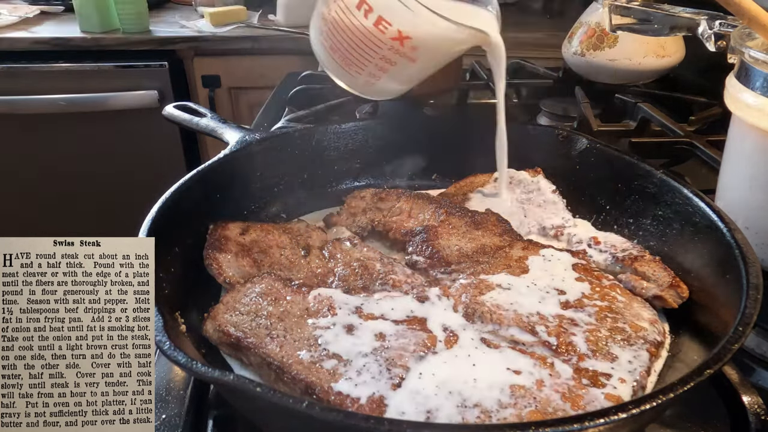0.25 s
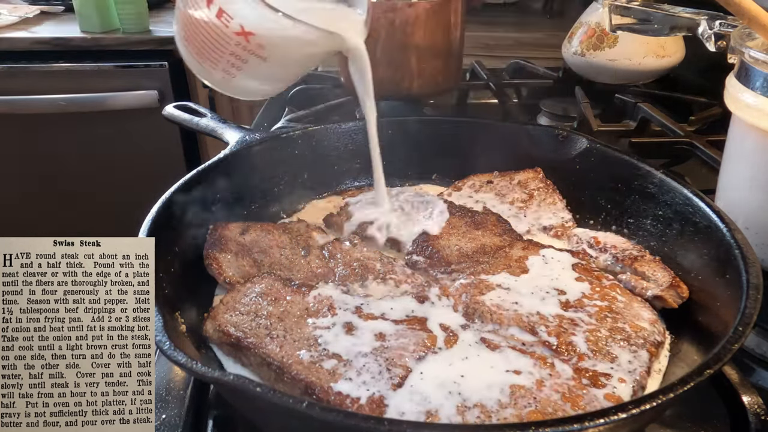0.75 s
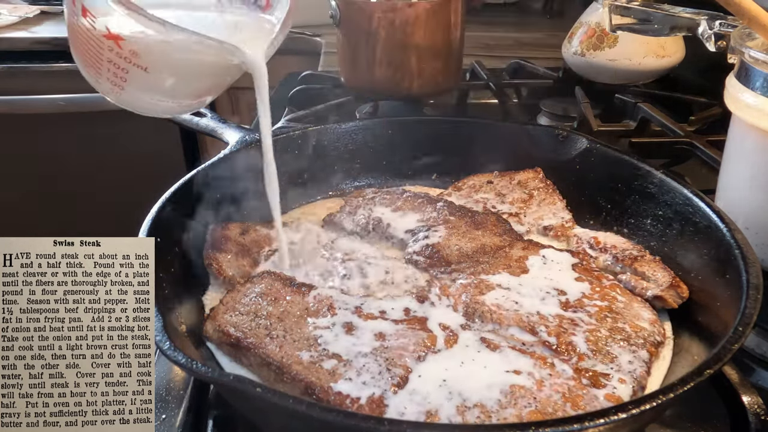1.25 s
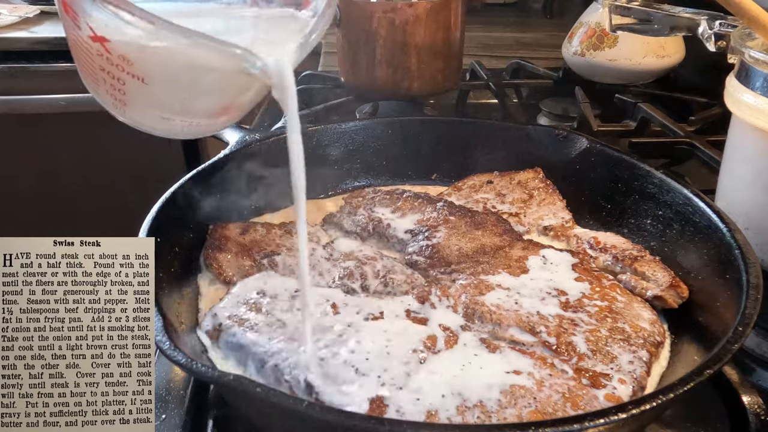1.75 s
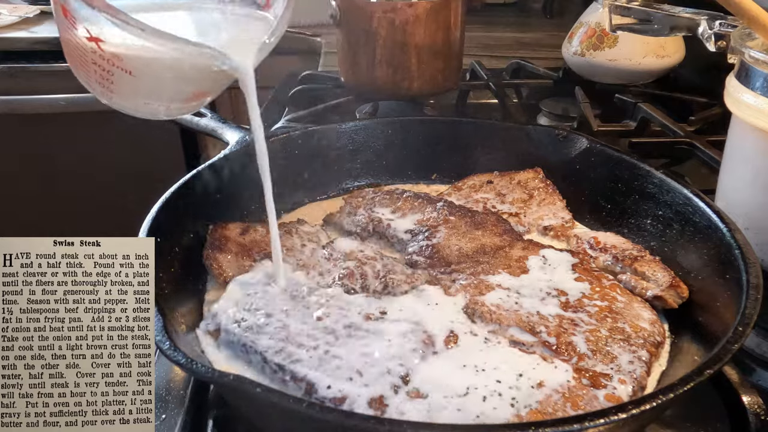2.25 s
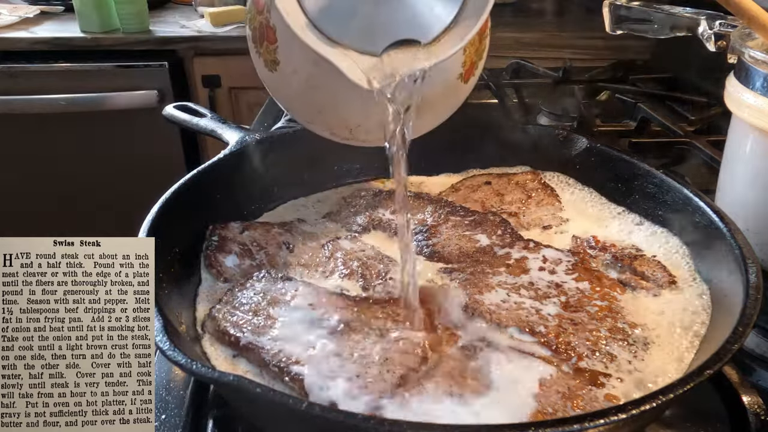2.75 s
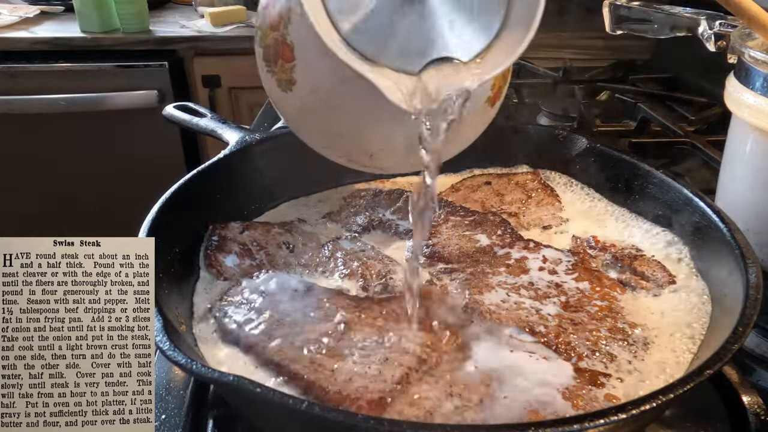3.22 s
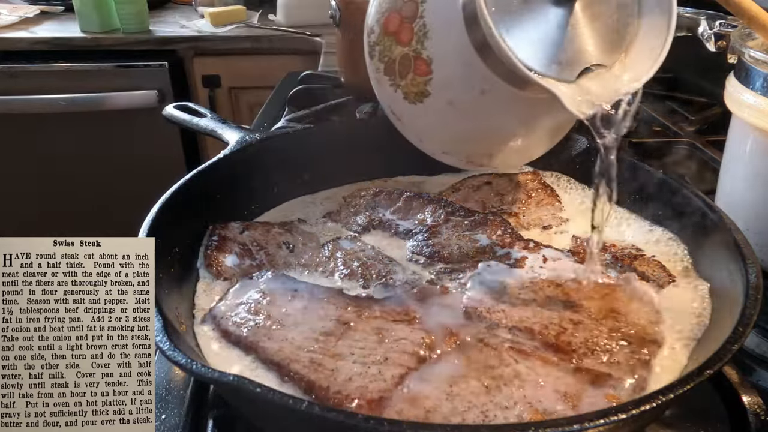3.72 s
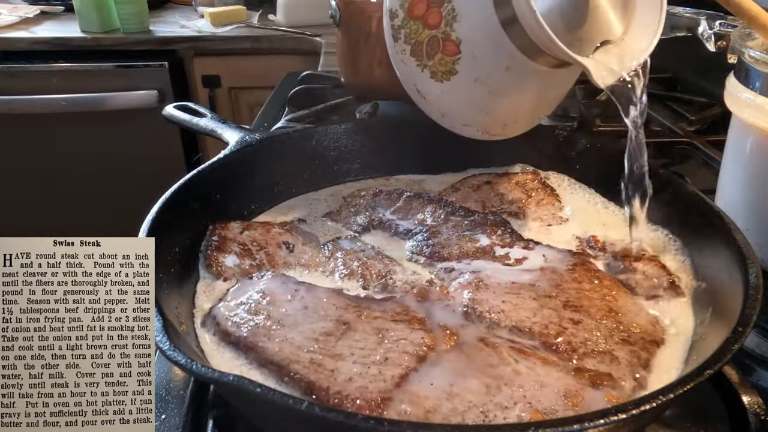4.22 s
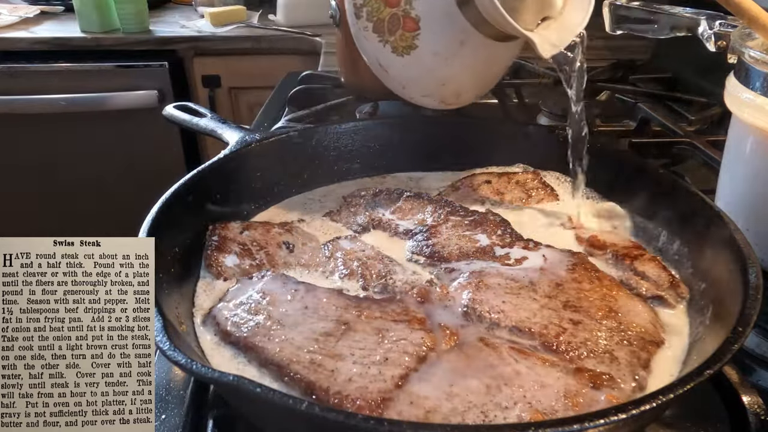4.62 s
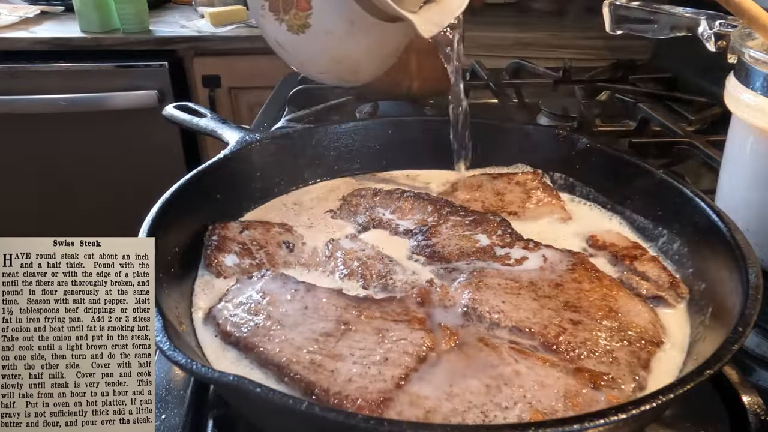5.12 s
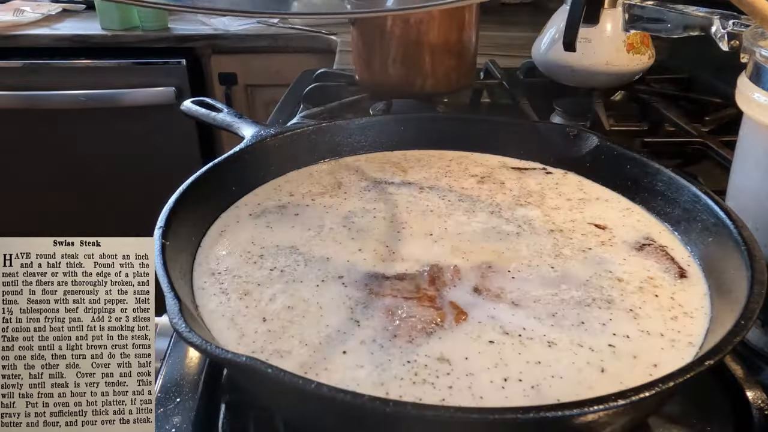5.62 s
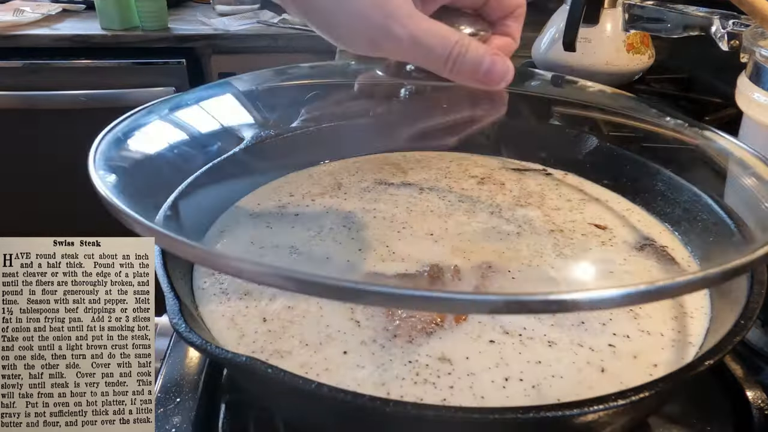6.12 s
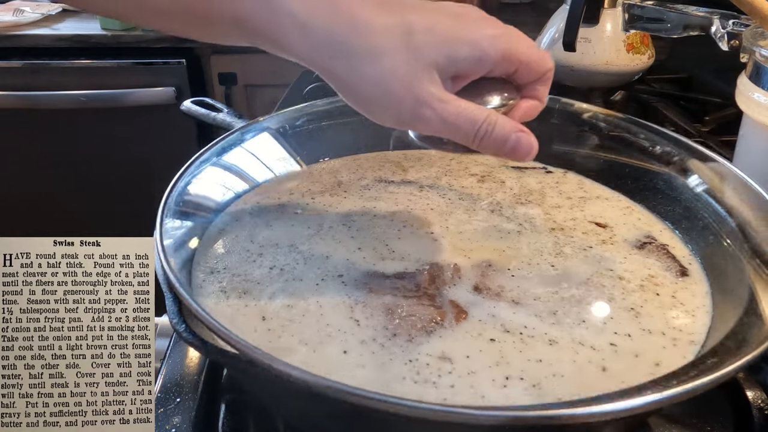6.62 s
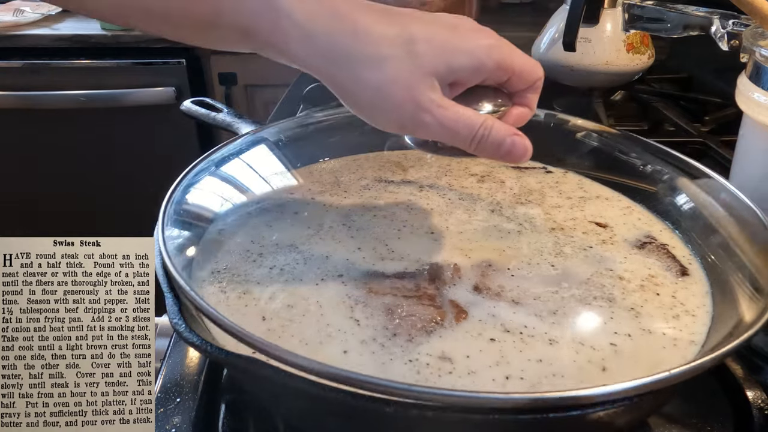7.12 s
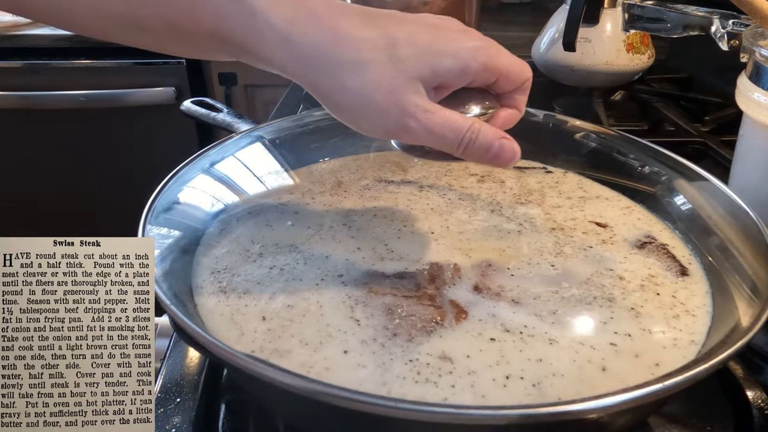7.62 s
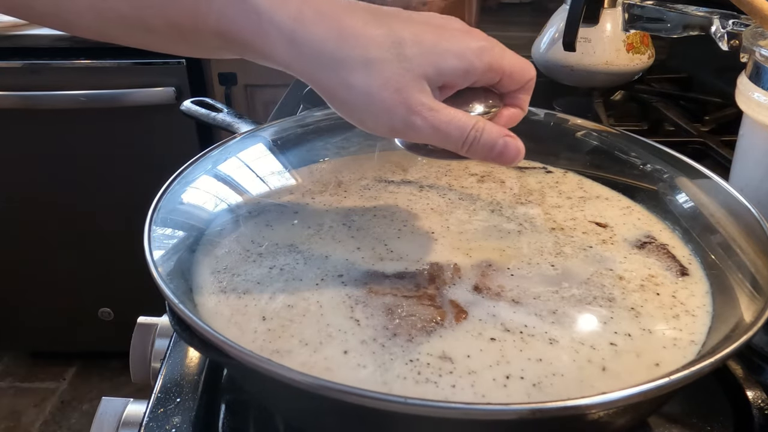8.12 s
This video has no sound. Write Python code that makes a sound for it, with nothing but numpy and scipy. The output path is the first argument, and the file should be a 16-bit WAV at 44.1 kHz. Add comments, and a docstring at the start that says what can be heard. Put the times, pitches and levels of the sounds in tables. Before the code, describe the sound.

A continuous, dense frying sizzle with airy steam hiss, heard close in a small kitchen. Random crackles run throughout, with loud dry snaps thrown out singly and in clusters, the metal pan giving each a very short echo. Low fan noise is barely audible underneath. After about seven seconds the sizzling bed sinks and grows quieter, but strong pops still jump out until the end.

```python
"""A home kitchen: meat fries in a cast-iron skillet while a fan rumbles and hums below.
The fan is low filtered noise with narrow noise bands for hums; hiss of steam and far fat is coloured noise.
Steam pockets bursting in hot fat make a dense sizzle: clumped random clicks through tuned resonances.
Louder pops add a ring of a few cycles, a thump, a crack and a spatter of droplets; the metal echoes them.
Near the end the steady layers and the small pops sink by several dB; the listed loud pops keep their levels."""
import sys
import numpy as np
from scipy import signal
from scipy.fft import rfft, irfft, next_fast_len
from scipy.io import wavfile
from scipy.ndimage import uniform_filter1d

SR = 44100
rng = np.random.default_rng(int(sys.argv[2]) if len(sys.argv) > 2 else 0)


def put_to_file(sound):
    """Save the sound as 16-bit audio at rate SR, in the file named by the first command-line argument."""
    columns = np.atleast_2d(sound).T  # one column per channel
    safe = np.clip(columns, -1, 1)
    whole_steps = np.round(safe * 32767)
    wavfile.write(sys.argv[1], SR, whole_steps.astype(np.int16))


N = 368676   # samples

# Low air rumble of the fan: (frequency [Hz], relative level per Hz [dB])
RUMBLE_SPECTRUM = [(15, -57), (25, -30), (79, 4), (103, 10), (257, -4), (365, -2.5), (400, -5), (520, -39),
                   (880, -120)]
# Fan hums: (frequency [Hz], width of each of two filter passes [Hz], level over the rumble [dB])
FAN_HUMS = [(113.4, 49, -9.5), (702, 39, -1.5), (1484, 220, 0)]
# Steam and far fat: (frequency [Hz], relative level per Hz [dB])
HISS_SPECTRUM = [(88, -33), (150, -6.5), (431, -8.5), (601, -7.5), (702, 0), (1040, -8), (1830, -10),
                 (3420, -2.5), (7770, -6), (11900, -6.5), (16000, -1.5)]
# Tiny bursts in the fat: (frequency [Hz], relative level per Hz [dB])
SIZZLE_SPECTRUM = [(590, -36), (1000, -3), (3500, 3.5), (4120, 3.5), (7620, 1.5), (12000, -3), (16000, 5)]
# Loud pops: (time [s], ring peak before its ceiling [dB], pocket pitch [Hz], length [ms],
#             thump peak [dB], crack peak [dB], spatter level [dB])
LOUD_POPS = [(.0175,-18.5,2750,1.3,-22,-4.5,-46),(.1192,-17,4640,2,-39,-29,-43),(.1816,-12.5,3730,1.2,-40,-31,-46),(.2443,-16,3600,2.2,-42,-26,-41),
             (.263,-10,7500,1.5,-24,-2.5,-39),(.3394,-15,2320,2.5,-44,-28,-26),(.3554,-11,5300,1.4,-16,-13,-30),
             (.3698,-9,3100,2.6,-15.5,-11.5,-31),(.438,-16,8160,.83,-38,-21,-31),(.559,-15,11300,.7,-45,-23,-27),
             (.5632,-8.5,11000,6.1,-41,-29,-46),(.5687,-6,7400,.6,-35,-19,-29),(.6469,-19,1540,2.7,-29,-15,-31),
             (.6647,-10.5,4350,2.3,-46,-30,-25.5),(.678,-15,3860,1.1,-40,-16,-38),(.6913,-12,2800,4.4,-18,-14,-25.5),
             (.7477,-16,3010,1.4,-40,-22,-46),(.7635,-11.5,9800,.91,-41,-22,-41),(.802,-13,4590,1.2,-40,-27,-46),(.833,-12,3100,3.1,-35,-13,-24),
             (.8537,-18,3420,1.7,-43,-18,-35),(.89,-19,1800,1.8,-33,-17,-46),(.9424,-13,8830,0.56,-40,-29,-42),(.9617,0,2550,2.3,-10.5,-6.5,-42),(.9922,-17,8040,.73,-49,-25,-30),(1.0242,-19,11500,.98,-43,-16,-46),(1.0542,-17,10800,1.4,-43,-26,-43),(1.175,-15,5960,0.55,-35,-11.5,-29),
             (1.2387,-22,3250,1.4,-39,-24,-17.5),(1.2477,-13,2800,4.5,-36,-35,-24),(1.3215,-9.5,9800,.56,-39,-24,-46),
             (1.3468,-15,7450,.84,-45,-25,-46),(1.3607,-12,4970,0.88,-44,-21,-32),(1.4038,-16.5,3630,3,-34,-27,-32),(1.4508,-17,6960,0.95,-31,-10.5,-34),
             (1.49,-15,2750,1,-43,-18,-31),(1.5898,-10,10200,1.3,-41,-25,-25),(1.6037,-8.5,9300,2.8,-44,-31,-25),
             (1.6287,-12,3100,3.2,-19.5,-16,-29),(1.6762,-13,6360,.86,-26,-12,-28.5),(1.815,-9,2450,0.63,-27,-5.5,-37),
             (1.925,-23,6400,.6,-39,-11,-30),(2.039,-9,5950,1.3,-22,-8,-46),(2.0965,-18,2800,1.7,-28,-12,-42),
             (2.1378,-17,5400,.84,-33,-20,-29),(2.373,-11,3730,1.5,-34,-31,-49),(2.4954,-17,4970,0.85,-15.5,-5.5,-42),
             (2.5768,-20,12000,2.9,-27,-9,-34),(2.5891,-9,1570,1.3,-12.5,-3,-23.5),(2.5952,-14,5070,7.9,-35,-22,-46),
             (2.6306,-7.5,2450,1.1,-9.5,-13,-30),(2.635,-13.5,4760,3.1,-37,-22,-35),(2.6514,-10,9800,0.38,-37,-16,-46),
             (2.7618,-13.5,5200,0.72,-43,-26,-46),(2.8298,-18.5,2000,1.7,-29,-8,-31),(2.8839,-17,3630,1.4,-40,-22,-47),(2.9405,-19,6450,0.76,-29,-13.5,-27),
             (3.0226,-2,1740,2.9,-5,-5,-23.5),(3.0788,-18,9400,1.4,-42,-15,-50),(3.0847,-14,9400,.65,-42,-11,-42),
             (3.1698,-17,11300,0.79,-40,-7.5,-45),(3.21,-14.5,4630,5.2,-28,-15.5,-23),(3.2713,-4,3030,0.67,-49,-15,-27),
             (3.3114,-14,3870,1.4,-41,-24,-30),(3.319,-10,9200,0.62,-37,-8.5,-29),(3.3684,-17.5,1610,2.7,-34,-19,-34),
             (3.407,-17,3520,4.2,-44,-32,-47),(3.4376,-9,2000,1.9,-28,-22,-29),(3.452,-17.5,1490,3.4,-33,-13,-42),
             (3.4745,-13.5,2000,1.3,-39,-23,-46),(3.5286,-15,3500,3.1,-30,-20,-37),(3.5714,-12.5,2960,3.7,-18.5,-32,-34),
             (3.6111,-11,2130,3.2,-17,-17,-34),(3.6179,-13,5300,3.3,-36,-30,-38),(3.759,-15,2590,0.98,-38,-7.5,-30),
             (3.8926,-16.5,3620,1.8,-37,-27,-44),(3.9522,-4,10300,0.4,-29,-15,-37),(4.0803,-17,3450,1.2,-36,-11,-33),(4.1235,-17,7430,.8,-45,-22,-32),
             (4.1346,-12,10140,.4,-47,-20,-45),(4.141,-4,1900,2,-7.5,-25,-25),(4.1695,-12,7800,1.3,-27,-27,-56),
             (4.1922,-14,8250,.83,-45,-27,-38),(4.226,-9.5,4540,3.4,-32,-26,-32),(4.2348,-6,6760,1.6,-29,-7.5,-18),
             (4.2452,-4,4960,.53,-32,-13,-38),(4.251,-15,5400,7,-38,-17,-21),(4.2644,-20,9190,.79,-42,-16,-47),
             (4.2786,-14,3790,0.9,-30,-10,-30),(4.2911,-11,9040,1.1,-28,-20,-30),(4.3154,-13,1310,2.8,-22,-8,-40),
             (4.3848,-18,11200,1.2,-30,-13,-46),(4.422,-24,8700,3.6,-23,-7.5,-28),(4.502,-18,3200,1.1,-28,-16,-25.5),
             (4.509,-26,3830,4.6,-33,-12,-26),(4.519,-18,5340,1.5,-24,-5,-35),(4.5934,-23,6200,.9,-28,-21,-26.5),
             (4.617,-16,11100,2.3,-39,-30,-32),(4.6327,-17,5000,1.8,-35,-11,-42),(4.6785,-12,2670,1.7,-30,-14,-30),
             (4.6849,-14.5,3140,10,-32,-11,-40),(4.8312,-16,2800,1.2,-31,-26,-27),(4.9328,-36,5330,2.8,-32,-15,-40),
             (4.9897,-13,3550,2.8,-22,-17,-42),(5.168,-19,11500,1.4,-26,-11,-37),(5.3056,-18,3530,3,-37,-18,-29),
             (5.5662,-14,4460,1.8,-37,-17,-22),(5.5735,-22,5200,2.8,-28.5,-10.5,-33),(5.6364,-22,3450,1.6,-47,-26,-30),
             (5.6514,-10.5,4160,0.65,-31,-16,-34),(5.677,-15,3920,1.4,-43,-27,-46),(5.7451,-12,2900,1.1,-25.5,-6,-37),(5.8914,-14.5,3530,4.1,-19.5,-17,-35),
             (5.91,-11.5,4390,0.89,-43,-16,-34),(6.0027,-16.5,2400,1.8,-37,-26,-42),(6.0739,-20,11480,0.64,-33,-12,-46),
             (6.1588,-22,7360,.8,-44,-7,-30),(6.1715,-9,4100,3,-29,-13,-16),(6.1802,-25,5450,2.4,-34,-11,-28),
             (6.192,-7.5,8240,3.7,-44,-20,-26),(6.317,-16,3260,2.1,-50,-8,-34),(6.374,-5,5960,2.6,-25,-27,-23),
             (6.4573,-17,7900,0.95,-42,-9.5,-43),(6.4852,-21,6960,3.1,-25,-15.5,-41),(6.5955,-20,2940,4,-28,-30,-32),
             (6.647,-22,7150,0.65,-47,-16,-37),(6.8024,-10,8300,0.56,-45,-31,-41),(6.8326,-4,8600,0.44,-48,-33,-48),
             (6.9176,-11.5,6000,0.64,-44,-26,-47),(6.9495,-17,3570,7.1,-34,-23,-29),(6.962,-13,3400,2.8,-41,-22,-44),
             (6.97,-4,3300,0.68,-39,-4,-26),(7.1146,-19,1850,2.1,-24,-25,-24.5),(7.1497,-3,3400,3.4,-5,-3,-31),
             (7.1682,-5,7950,1.4,-22,-7,-22),(7.2284,-12,5700,0.69,-21.5,-5.5,-43),(7.323,-12,3000,2,-14,-3.5,-22),
             (7.3675,-6.5,4270,2,-43,-26,-29.5),(7.4087,-17.5,4350,1.5,-44,-34,-47),(7.5278,-16.5,1950,.79,-25.5,-27,-64),
             (7.5863,-19,9230,2.8,-41,-33,-29),(7.6451,-9,4600,1.3,-20.5,-15,-39),(7.65,-11,3260,3,-34,-9,-24),
             (7.765,-8,4230,0.94,-24,-10,-33),(7.7853,-18,3120,1.5,-32,-22,-50),(7.795,-17,2940,3.2,-26,-26,-36),(7.8197,-11.5,4630,0.75,-32,-11,-39),
             (7.9102,-20,5300,1.7,-50,-38,-34),(7.9617,-8.5,1950,1.18,-52,-30,-28),(7.994,-21,7540,4,-37,-18.5,-34),
             (8.0325,-12,7600,4.9,-30,-13,-27),(8.0521,-25,7340,.8,-39,-16,-36),(8.2981,-22,3750,3.6,-53,-34,-47)]
# Sinking of the steady layers and small pops: (time [s], level [dB])
FADE_CURVE = [(0, 0.5), (7.25, 0), (7.62, -4.5), (8.36, -6.5)]

# Steady layers: rms levels before the fade [dB], and the share of the fade that each follows
RUMBLE_DB, HISS_DB, SIZZLE_DB = -55.5, -36, -35.5
RUMBLE_FADE_SHARE, HISS_FADE_SHARE, SIZZLE_FADE_SHARE = 1.16, 1.14, 0.89

# Sizzle: rate before clumping [1/s], mean spread of sizes before the cap [dB], depth of clumping [dB]
BURSTS_PER_S, SIZE_SPREAD_DB, CLUMP_DB = 5000, 5.0, 3.5

# Every pop
THUMP_START_HZ = 1314
RAGGED_MS = 3.53          # a burst this long is all tearing, no clean ring
LOUDEST_RING_DB = -4      # no pocket rings louder than this
POP_LOW_CUT_HZ = 111      # a burst is too small to push deep bass

# Small pops at random: levels before the spread and the fade, full width of the spread
SMALL_PER_S, SMALL_SPREAD_DB = 11, 3
SMALL_RING_DB, SMALL_THUMP_DB, SMALL_CRACK_DB, SMALL_SPATTER_DB = -21, -35, -22, -47
SMALL_LOW_HZ, SMALL_HIGH_HZ, SMALL_MEAN_CYCLES = 2180, 11000, 6.1

# Skillet wall and stove surround
WALL_DELAY_S, WALL_T60_S, WALL_DB = 0.00349, 0.077, -15

# Microphone and top cut
MIC_LOW_HZ, MIC_SHELF_HZ, MIC_SHELF_DB = 73, 12750, -10
CUTOFF_HZ = 16300


def from_db(db):
    """Decibels to amplitude."""
    return 10 ** (np.asarray(db) / 20)


def rms_one(x):
    """Scale to an rms of 1."""
    return x / np.sqrt(np.mean(x ** 2) + 1e-20)


def peak_one(x):
    """Scale to a peak of 1."""
    return x / np.abs(x).max()


def fade_at(seconds):
    """The fade in dB at the given times."""
    return np.interp(seconds, *np.transpose(FADE_CURVE))


def at_hz(spectrum, hz):
    """Read a spectrum table along log frequency."""
    table_hz, table_db = np.transpose(spectrum)
    return np.interp(np.log(hz), np.log(table_hz), table_db)


def drift(rate_hz):
    """Slow random wander with spread 1, made at a twentieth of the sample rate."""
    r = np.exp(-40 * np.pi * rate_hz / SR)
    noise = rng.standard_normal(N // 20 + 2002)
    slow = signal.lfilter([1], [1, -2 * r, r * r], noise)[2000:]   # drop the filter's settling
    return np.interp(np.arange(N) / 20, np.arange(len(slow)), rms_one(slow))


def resonate(x, hz, width_hz):
    """One resonance with gain 1 on top."""
    r = np.exp(-np.pi * width_hz / SR)
    feedback = [1, -2 * r * np.cos(2 * np.pi * hz / SR), r * r]
    return signal.lfilter([(1 - r * r) / 2, 0, (r * r - 1) / 2], feedback, x)


def swell(t, length):
    """A quick rise and a slower fall, about 18 dB below its top after the length."""
    return 3.4 * t / length * np.exp(1 - 4.54 * t / length)


def coloured(spectrum):
    """Steady noise of a given spectrum, rms 1."""
    size = next_fast_len(N)
    hz = np.maximum(np.arange(size // 2 + 1) * SR / size, 1)
    white = rfft(rng.standard_normal(size))
    return rms_one(irfft(white * from_db(at_hz(spectrum, hz)), size)[:N])


def fan(rumble_db):
    """Low air rumble, with noise through narrow resonances as wavering hums."""
    mix = coloured(RUMBLE_SPECTRUM)
    for hz, width, db in FAN_HUMS:
        narrowed = resonate(rng.standard_normal(N), hz, width)
        mix += from_db(db) * rms_one(resonate(narrowed, hz, width))
    return from_db(rumble_db) * mix


def steam_hiss(hiss_db):
    """Steam and far fat blur into coloured noise whose level flickers slightly."""
    return from_db(hiss_db + 0.23 * drift(22)) * coloured(HISS_SPECTRUM)


def sizzle(sharpness):
    """Tiny bursts come in clumps; each rings briefly at the pitch of its pocket."""
    size_db = SIZE_SPREAD_DB * np.minimum(rng.exponential(1, N), 4.6)
    sizes = from_db(size_db) * rng.choice([-1, 1], N)
    rate = BURSTS_PER_S * from_db(CLUMP_DB * (drift(45) + .4 * drift(10)))
    bursts = sizes * (rng.random(N) < rate / SR)
    pitches = np.geomspace(1100, 15000, 24)
    dealt = rng.integers(0, 24, N)   # which pitch each burst gets
    out = np.zeros(N)
    for k, hz in enumerate(pitches):
        clicks = bursts * (dealt == k) + 1e-18
        width = hz / sharpness
        ringing = resonate(resonate(clicks, hz, width), hz, 2 * width)
        out += from_db(at_hz(SIZZLE_SPECTRUM, hz)) * ringing
    return rms_one(out)


def small_pops():
    """Rows for many small pops, equally likely at any moment; small pockets ring high and short."""
    when, pitch, length, *sizes = rng.random((int(SMALL_PER_S * N / SR), 7)).T
    s = when * N / SR
    hz = SMALL_LOW_HZ * (SMALL_HIGH_HZ / SMALL_LOW_HZ) ** pitch
    ms = SMALL_MEAN_CYCLES / hz * 1000 * (.5 + length)
    centres = SMALL_RING_DB, SMALL_THUMP_DB, SMALL_CRACK_DB, SMALL_SPATTER_DB
    ring_db, thump_db, crack_db, spatter_db = (
        db + SMALL_SPREAD_DB * (size - .5) + fade_at(s) for db, size in zip(centres, sizes))
    return np.transpose([s, ring_db, hz, ms, thump_db, crack_db, spatter_db])


def pocket_ring(t, hz, length, sharpness, tear):
    """A bursting pocket rings at its own pitch; the longer the burst, the more it tears into noise."""
    ragged = np.clip(1000 * length / RAGGED_MS, 0, 1) ** 2
    clean = np.sin(2 * np.pi * hz * t * (1 + 0.008 * t / length))   # the pocket shrinks, pitch creeps up
    torn = rms_one(resonate(tear, hz, hz / sharpness))
    return peak_one(((1 - ragged) * clean + ragged * torn) * swell(t, length))


def thump(t):
    """The burst's low push sags in pitch as it dies."""
    push = np.sin(2 * np.pi * THUMP_START_HZ * t / (1 + 250 * t))
    return peak_one(push * swell(t, 1.38 / THUMP_START_HZ))


def spatter(t, hz, length, t60, spray, drops):
    """Droplets land unevenly around the pocket pitch, building fast and dying away."""
    lumps = from_db(7.8 * uniform_filter1d(drops, size=50) * np.sqrt(50))
    landing = resonate(resonate(spray, hz, 2.4 * hz), hz, 0.63 * hz) * lumps
    build = np.minimum(t / (length + 0.0011), 1) ** 2
    return 1.85 * rms_one(landing) * build * from_db(-60 * t / t60)


def pops(rows, sharpness, spatter_t60):
    """Each pop: a ring at the pocket pitch, a low thump, a broad crack and a spatter."""
    t = np.arange(int(.08 * SR)) / SR
    broad = signal.butter(3, [1750, 14500], "band", fs=SR, output="sos")
    noise = rng.standard_normal((len(rows), 4, len(t)))
    out = np.zeros(N + len(t))
    for row, (tear, grit, spray, drops) in zip(rows, noise):
        s, ring_db, hz, ms, thump_db, crack_db, spatter_db = row
        length = ms / 1000
        crack = peak_one(signal.sosfilt(broad, grit) * swell(t, 1.07 * length))
        pop = from_db(min(ring_db, LOUDEST_RING_DB)) * pocket_ring(t, hz, length, sharpness, tear)
        pop += from_db(thump_db) * thump(t)
        pop += from_db(crack_db) * crack
        pop += from_db(spatter_db) * spatter(t, hz, length, spatter_t60, spray, drops)
        at = round(s * SR)
        out[at:at + len(t)] += pop
    low_cut = signal.butter(2, POP_LOW_CUT_HZ, "high", fs=SR, output="sos")
    return signal.sosfilt(low_cut, out[:N] + 1e-18)


def walls(x):
    """A short scattered echo from skillet wall and stove surround."""
    t = np.arange(int(.12 * SR)) / SR
    echo = rng.standard_normal(len(t)) * (t > WALL_DELAY_S) * from_db(-60 * t / WALL_T60_S)
    return from_db(WALL_DB) * signal.fftconvolve(x, echo / np.linalg.norm(echo))[:N]


def scene():
    """The skillet with its echo over the kitchen's fan and the steam hiss."""
    fade_db = fade_at(np.arange(N) / SR)
    background = fan(RUMBLE_DB + RUMBLE_FADE_SHARE * fade_db)
    hiss = steam_hiss(HISS_DB + HISS_FADE_SHARE * fade_db)
    skillet = from_db(SIZZLE_DB + SIZZLE_FADE_SHARE * fade_db) * sizzle(sharpness=3.03)
    skillet += pops(np.vstack([LOUD_POPS, small_pops()]), sharpness=4.6, spatter_t60=0.05)
    return (background + hiss + skillet + walls(skillet))[None]


def record(dry):
    """The microphone loses deep bass and steps down in the top treble; peaks are rounded, the top is cut."""
    x = signal.sosfilt(signal.butter(3, MIC_LOW_HZ, "high", fs=SR, output="sos"), dry)
    hz = np.arange(N // 2 + 1) * SR / N
    shelf_db = MIC_SHELF_DB / (1 + np.exp((MIC_SHELF_HZ - hz) / 300))
    x = irfft(rfft(x) * from_db(shelf_db), N)
    x = x / (1 + (x / .8) ** 4) ** .25   # rounds peaks towards 0.8
    return signal.sosfilt(signal.cheby2(14, 70, CUTOFF_HZ, fs=SR, output="sos"), x)


dry = scene()
out = record(dry)
put_to_file(out)
```